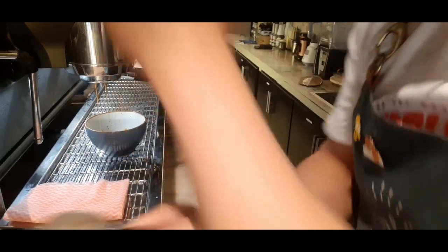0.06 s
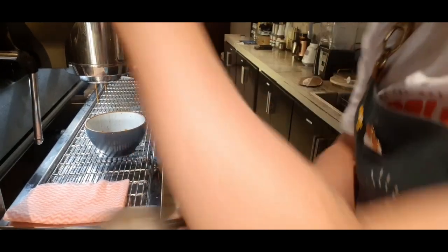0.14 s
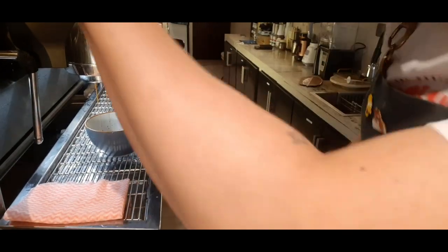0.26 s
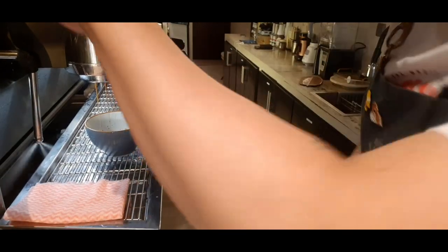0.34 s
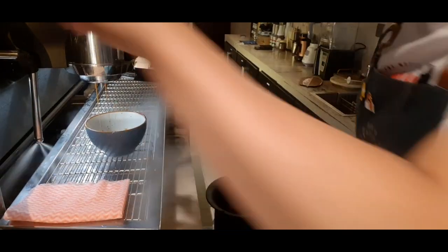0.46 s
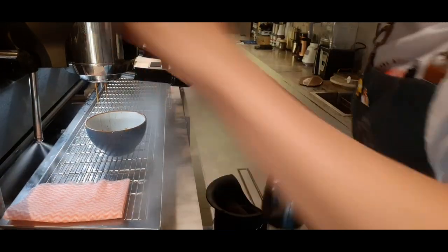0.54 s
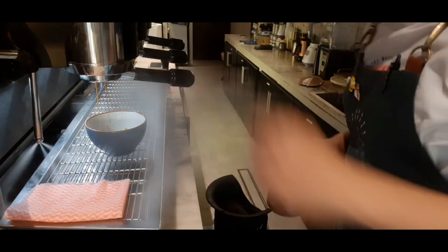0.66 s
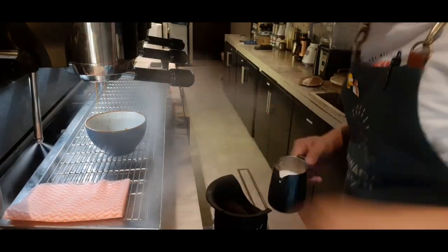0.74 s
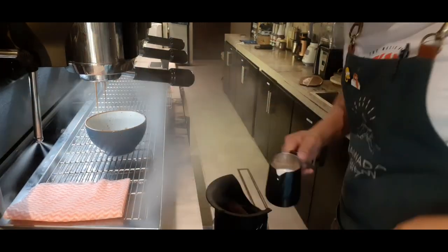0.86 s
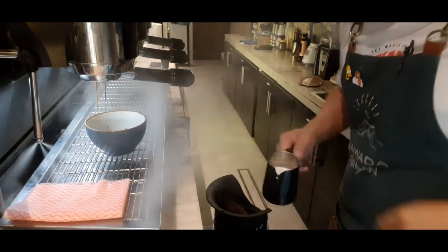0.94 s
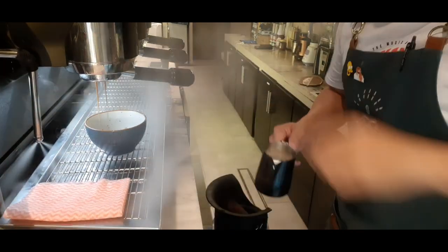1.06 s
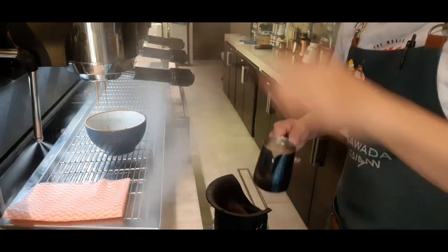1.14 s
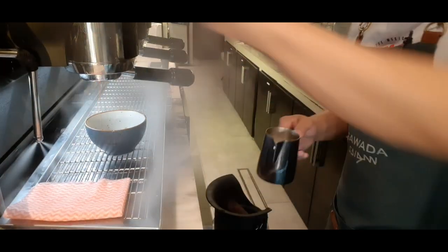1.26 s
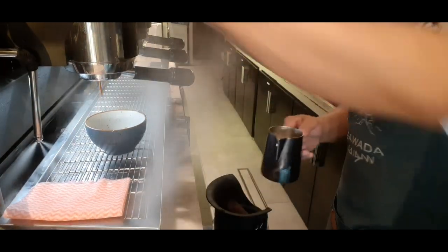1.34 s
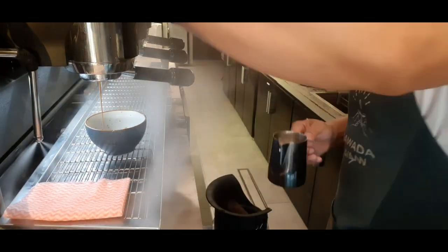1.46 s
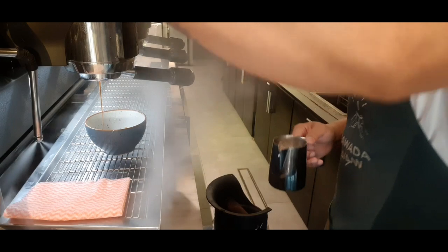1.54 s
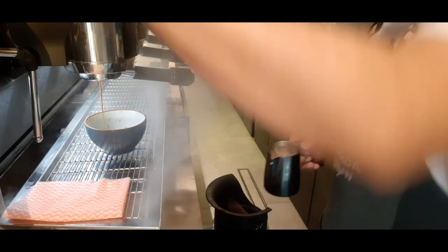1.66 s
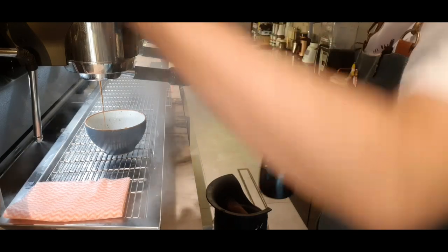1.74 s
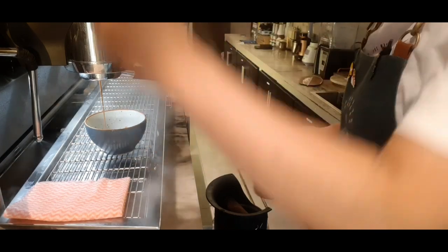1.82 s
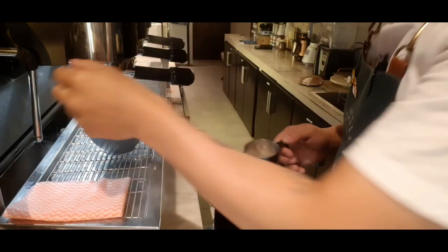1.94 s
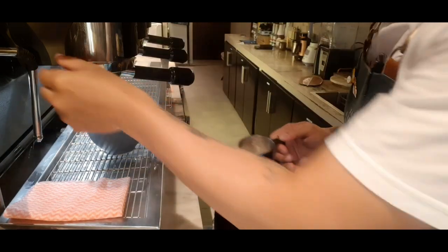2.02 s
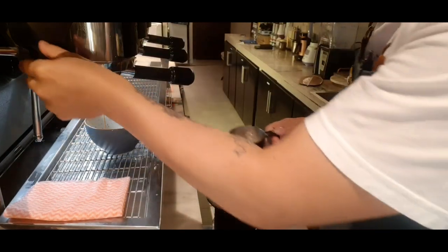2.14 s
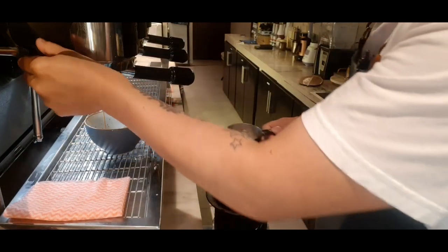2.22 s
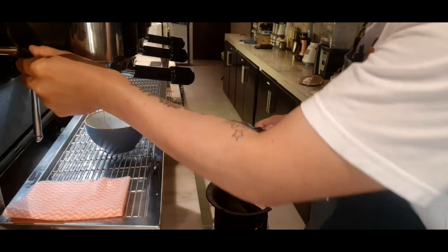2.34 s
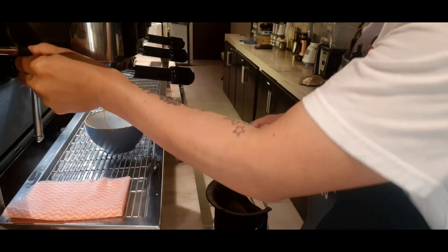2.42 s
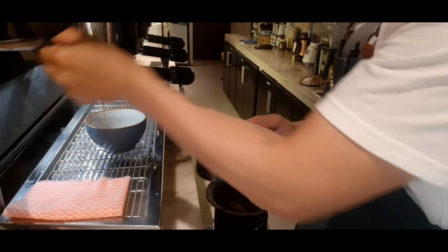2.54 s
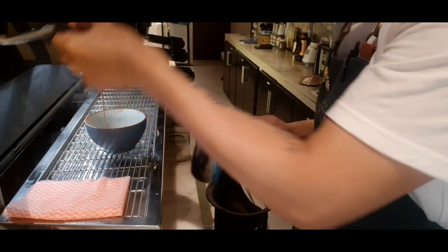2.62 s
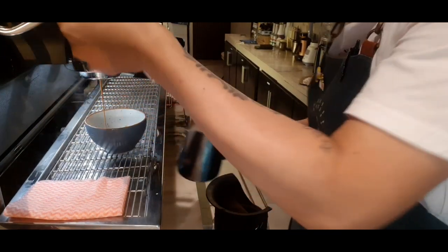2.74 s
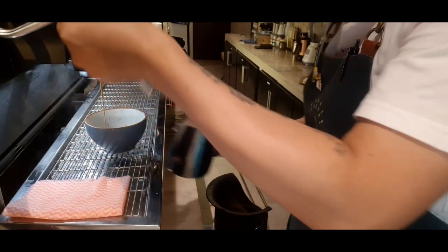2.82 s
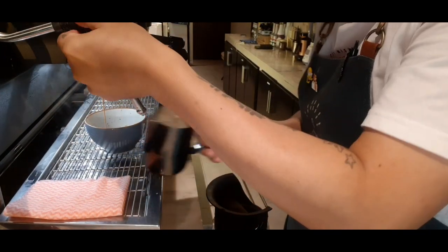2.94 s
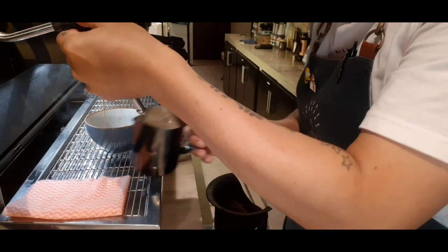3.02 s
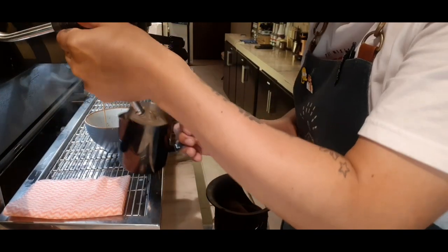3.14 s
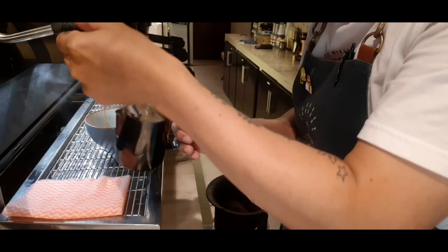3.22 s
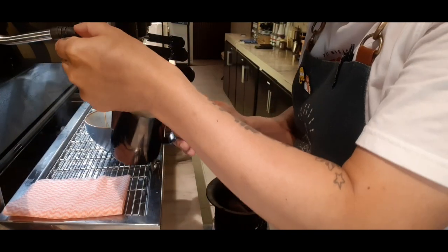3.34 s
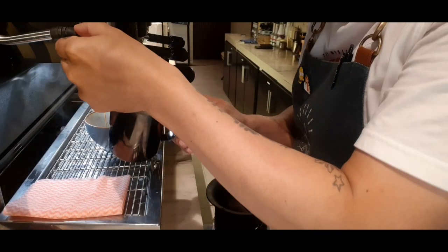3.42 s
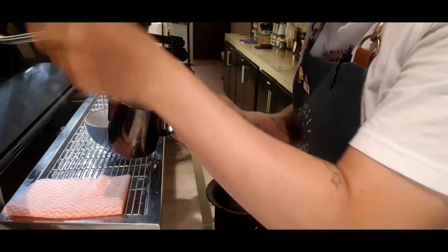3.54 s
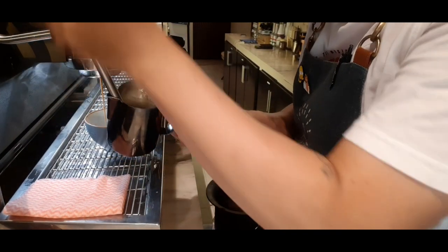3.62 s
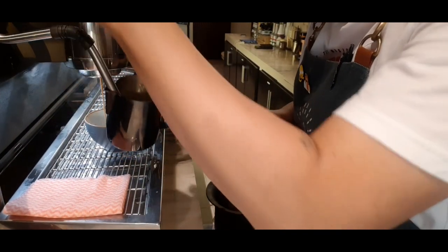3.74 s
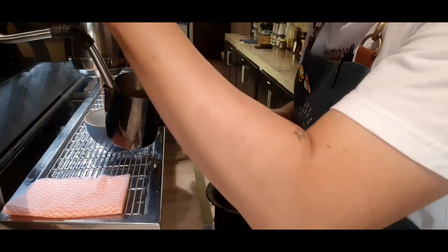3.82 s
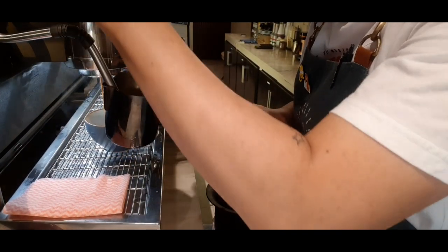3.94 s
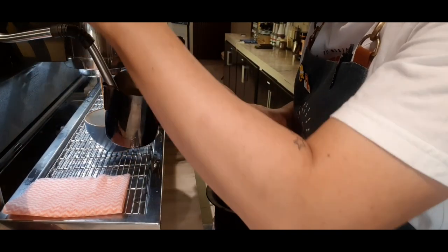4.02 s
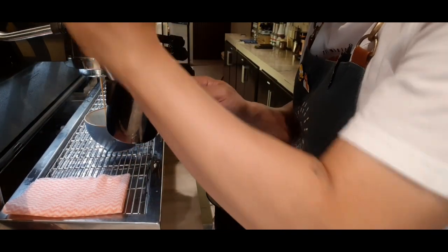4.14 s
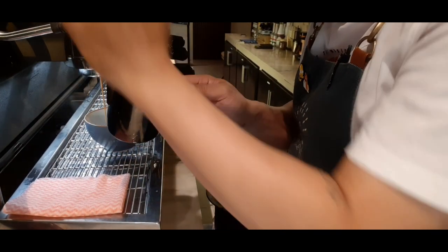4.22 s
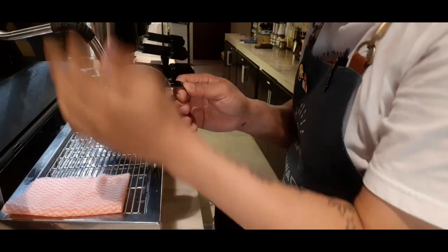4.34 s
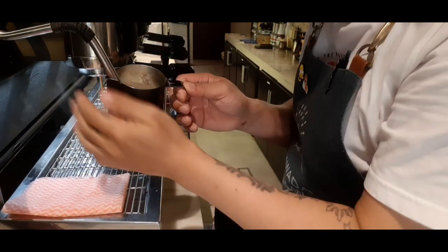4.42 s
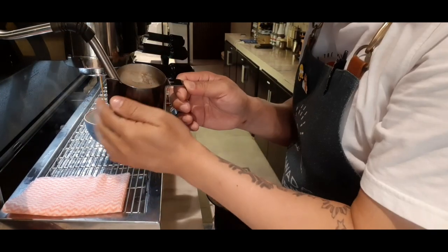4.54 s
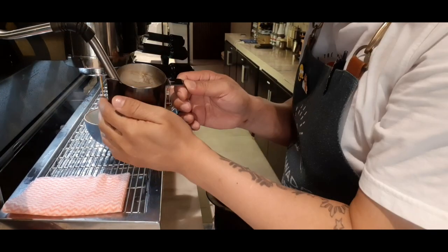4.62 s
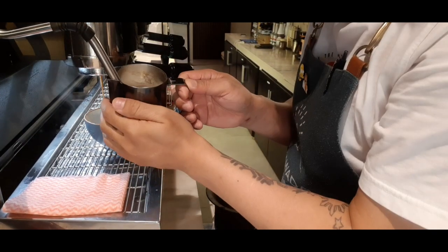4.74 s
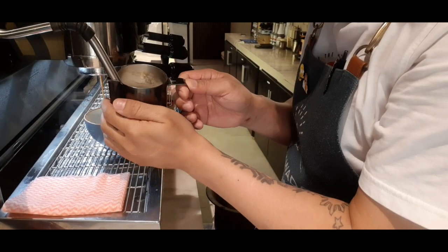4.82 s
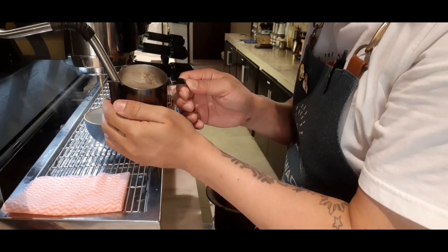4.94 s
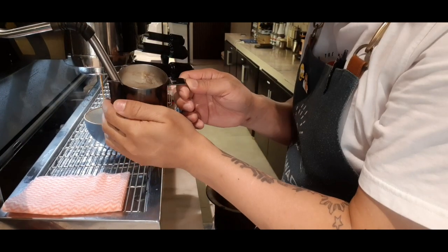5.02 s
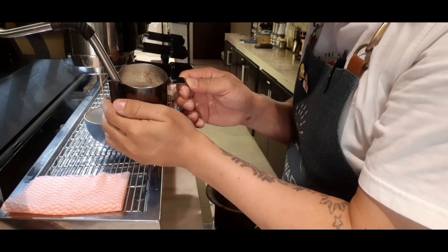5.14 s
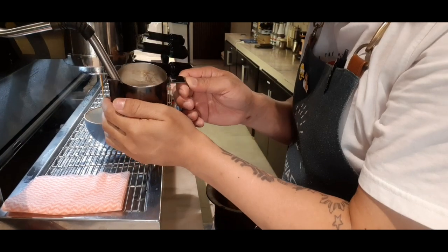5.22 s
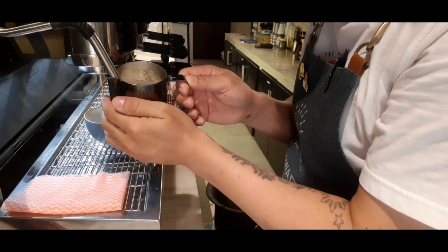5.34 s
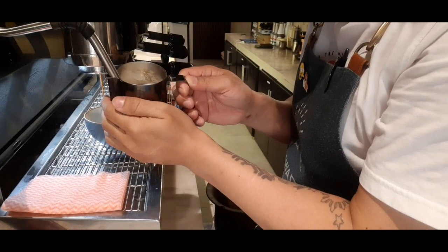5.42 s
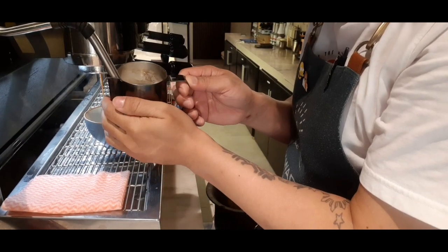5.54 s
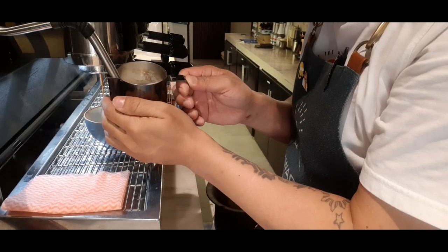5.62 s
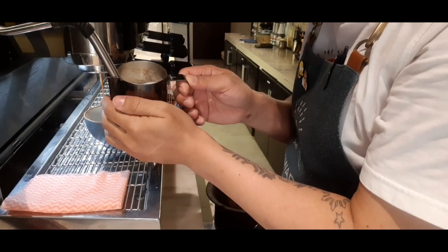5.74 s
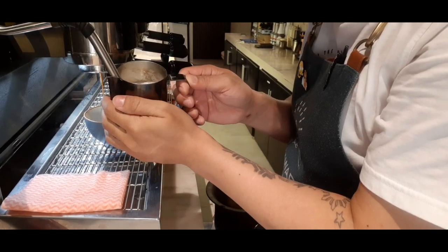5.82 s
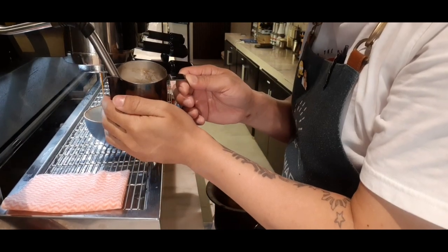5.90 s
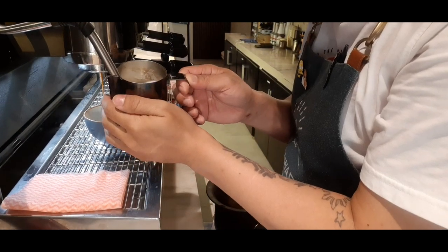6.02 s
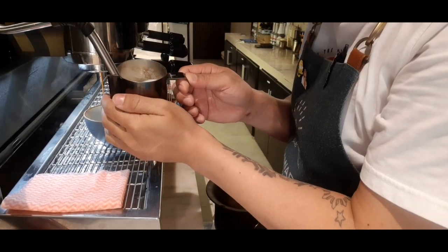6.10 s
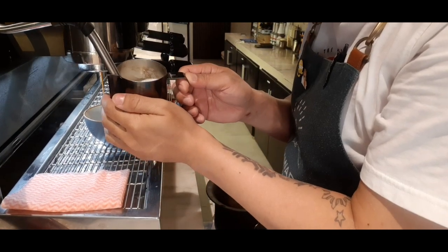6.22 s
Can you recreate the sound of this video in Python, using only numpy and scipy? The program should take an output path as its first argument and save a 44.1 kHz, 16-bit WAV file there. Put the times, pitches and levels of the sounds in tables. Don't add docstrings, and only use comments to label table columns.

```python
import sys
import numpy as np
from scipy import signal
from scipy.fft import rfft, irfft, next_fast_len
from scipy.io import wavfile

SR = 44100
rng = np.random.default_rng(int(sys.argv[2]) if len(sys.argv) > 2 else 0)


def unload_wav(signal):
    wavfile.write(
        sys.argv[1],
        SR,
        np.round(np.clip(np.atleast_2d(signal).T, -1, 1) * 32767).astype(np.int16),
    )


def ratio_of_db(decibels):
    return 10 ** (np.asarray(decibels, float) / 20)


N = 276507
TIME = np.arange(N) / SR
SURFACE_S = 4.95


def in_time(rows):
    s, *columns = np.transpose(rows)
    return [np.interp(TIME, s, c) for c in columns] + [(TIME >= s[0]) & (TIME <= s[-1])]


def at_hz(points, hz):
    table = np.array(points)
    return np.interp(np.log(hz + 1), np.log(table[:, 0]), table[:, 1])


def rms_one(x):
    return x / np.sqrt(np.mean(x ** 2) + 1e-20)


def drift(rate):
    r = np.exp(-32 * np.pi * rate / SR)
    slow = signal.lfilter([1], [1, -2 * r, r * r], rng.standard_normal(N // 16 + 4002))[4000:]
    return np.interp(np.arange(N) / 16, np.arange(len(slow)), rms_one(slow - slow.mean()))


def lagged(envelope, lag_s):
    r = np.exp(-1 / (lag_s * SR))
    return 20 * np.log10(signal.lfilter([1 - r], [1, -r], envelope) + 1e-4)


def filtered(x, order, hz, kind):
    return signal.sosfilt(signal.butter(order, hz, kind, fs=SR, output="sos"), x)


def stereo_noise(alike, lag):
    size = next_fast_len(N)
    hz = np.arange(size // 2 + 1) * SR / size
    shared, left, right = rfft(rng.standard_normal((3, size)))
    c = np.clip(at_hz(alike, hz), 0, 1)
    turn = at_hz(lag, hz) if np.ndim(lag) else 2 * np.pi * hz * lag / SR
    late = shared * np.exp(-1j * turn)
    return hz, size, np.sqrt(c) * np.array([late, shared]) + np.sqrt(1 - c) * np.array([left, right])


def hiss(colour, alike, lag, patchy_db, rate, count=9):
    hz, size, white = stereo_noise(alike, lag)
    place = np.interp(np.log(hz + 1), np.log([colour[0][0], colour[-1][0]]), [0, count - 1])
    out, together, shaped = 0, drift(rate), white * ratio_of_db(at_hz(colour, hz))
    for k in range(count):
        band = irfft(shaped * np.clip(1 - np.abs(place - k), 0, 1), size)[:, :N]
        out = out + band * ratio_of_db(patchy_db * (2.14 * together + drift(rate)))
    return rms_one(out)


def resonant(x, modes):
    out = 0
    for k, (hz, width, db) in enumerate(modes):
        r = np.exp(-np.pi * width / SR)
        ringing = signal.lfilter([1, 0, -1], [1, -2 * r * np.cos(2 * np.pi * hz / SR), r * r], x)
        out = out + (-1) ** k * ratio_of_db(db) * rms_one(ringing)
    return out


def twice_resonant(noise, mode):
    return resonant(resonant(noise, [mode]), [mode])


def bursts(rows, rise, bend=0.87):
    out = np.zeros(N)
    for s, db, t60 in rows:
        at = round(s * SR)
        t = np.arange(N - at) / SR
        out[at:] += ratio_of_db(db - 60 * (t / max(t60, .005)) ** bend) * (1 - np.exp(-(t / rise) ** 2))
    return out


def ring(s, db, hz, t60, climb):
    out, t = np.zeros(N), np.arange(round(1.5 * t60 * SR)) / SR
    at = round(s * SR)
    fade = ratio_of_db(db - 60 * t / t60) * (1 - np.exp(-3.0 * hz * t))
    out[at:at + len(t)] = fade * np.sin(2 * np.pi * hz * t * (1 + climb * t))
    return out


def placed(x, pan_db, lag):
    late = np.interp(np.arange(N) - lag, np.arange(N), x)
    return np.array([ratio_of_db(pan_db / 2) * late, ratio_of_db(-pan_db / 2) * x])


# t/s, level/dB
ROOM = [(0.0, -24), (0.33, -21.5), (0.49, -28), (0.73, -39.5), (1.6, -39.5), (2.04, -40.5), (2.83, -38),
        (3.2, -28), (3.4, -24.5), (4.14, -24), (4.19, -36.5), (4.45, -37), (4.91, -34), (5.19, -38.5),
        (6.27, -37)]
# f/Hz, level/dB per Hz
ROOM_COLOUR = [(25, -20), (38, -14), (52, -3.5), (95, -8.5), (150, -3.5), (263, -8.5), (400, -11.5),
               (800, -13), (1160, -16), (1700, -18.5), (3000, -25.5), (5000, -33), (7700, -36),
               (11000, -39), (16000, -37.5)]
# f/Hz, likeness
ROOM_ALIKE = [(60, 0.94), (130, 0.97), (290, 0.71), (640, 0.33), (1410, -0.19), (3100, 0.017),
              (6820, -0.054), (15000, -0.02)]
# f/Hz, width/Hz, level/dB
HUM = [(55, 11, -17), (119.3, 5.6, -12), (156, 20, -16), (209.3, 8.1, -16), (239.9, 4, -14.5),
       (266.8, 5.4, -9.5), (359.7, 5.9, -12.5), (489, 67, -14), (1550, 28, -17.5)]


def room():
    db = in_time(ROOM)[0]
    air = hiss(ROOM_COLOUR, ROOM_ALIKE, 0, patchy_db=.6, rate=6.0, count=12)
    tones = resonant(rng.standard_normal(N), HUM)
    mains = ratio_of_db(-5.0 + 0.94 * drift(3.1)) * np.sin(2 * np.pi * 119.7 * TIME)
    return ratio_of_db(db - 0.24) * (air + tones + mains) * ratio_of_db([[-.6], [.6]])


def burbles():
    pops = (rng.random(N) < 70.0 / SR) * ratio_of_db(14.0 * np.minimum(rng.exponential(1, N), 3))
    pool = resonant(pops + 1e-18, [(1130, 60, -10.0), (1200, 120, -18.0)])
    return placed(ratio_of_db(in_time(ROOM)[0] - 25) * pool, -1.5, 4.8)


# t/s, level/dB, f/Hz
DRIPS = [(1.9242, -26, 1140), (1.945, -33, 1150), (1.974, -34, 1210), (2.0239, -31, 1094),
         (2.0549, -39, 1170), (2.125, -44, 1250), (2.1561, -32, 1140), (2.202, -37, 1160),
         (2.2245, -37, 1170), (2.2634, -33, 1130), (2.278, -33, 1150), (2.292, -34, 1150),
         (2.35, -36, 1110), (2.3768, -28, 1110), (2.4415, -36, 1150), (2.465, -36, 1130),
         (2.5163, -32, 1160), (2.53, -35, 1150), (2.565, -38, 1090), (2.6745, -36, 1110),
         (2.7144, -37, 1130), (2.79, -33, 1110), (2.8447, -25, 1110), (2.8979, -29, 1140),
         (2.9144, -28, 1130), (3.0087, -36, 1070), (3.0681, -33, 1110), (3.1504, -23, 1170),
         (3.1888, -22, 1220), (3.2327, -18, 1080), (3.2636, -36, 1070), (3.301, -21, 1150),
         (3.32, -23, 1110)]


def drips():
    return placed(sum(ring(s, db - 1.5, hz, 0.033, 1.0) for s, db, hz in DRIPS), -4.0, 4.0)


# t/s, level/dB, t60/s
PUFFS = [(1.7659, -20, 0.13), (1.805, -20, 0.06), (1.8357, -25, 0.05), (1.856, -17, 0.029),
         (2.7901, -42, 0.05), (3.3049, -14, 0.13), (3.4247, -20.5, 0.069), (3.923, -18.5, 0.047),
         (4.962, -19, 0.18)]


def puffs():
    breath = filtered(rng.standard_normal((2, N)), 1, [2500, 9000], "band")
    return ratio_of_db(-0.5) * bursts(PUFFS, rise=0.00074) * breath


# t/s, level/dB, f/Hz, t60/s
KNOCKS = [(.355, -2.5, 725, 0.018), (0.4, -0.5, 155, 0.025), (.427, -6, 230, .02), (0.38, -10, 203, 0.023),
          (4.111, -17, 1110, .02), (4.139, 2, 600, 0.011), (4.959, -7, 180, 0.012), (5.032, -14, 97, 0.048),
          (5.016, -18.5, 440, 0.032), (5.124, -24, 540, 0.013), (4.404, -13, 5900, .012),
          (3.306, -27, 3300, .05), (3.306, -24, 5700, .04), (3.307, -26, 6800, .05),
          (3.306, -19, 6600, .06), (4.404, -16, 2700, 0.012), (3.428, -22, 3450, 0.037),
          (4.157, -15.5, 1870, 0.025), (4.961, -3, 1900, 0.0026)]


def knocks():
    return placed(sum(ring(*row, 0) for row in KNOCKS), -4.0, 4.0)


# t/s, level/dB, start f/Hz, end f/Hz, length/s
SQUEAK = (4.106, -19, 12150, 11800, .016)


def squeak():
    s, db, start_hz, end_hz, length = SQUEAK
    bend = (end_hz / start_hz - 1) / length / 3
    return placed(ring(s, db, start_hz, 2.5 * length, bend), -4.0, 4.0)


# t/s, level/dB, start f/Hz, end f/Hz, length/s, octave level/dB
CREAK = (.324, -23, 5900, 6480, .026, -8)


def creak():
    s, db, start_hz, end_hz, length, octave_db = CREAK
    along = np.clip((TIME - s) / length, 0, 1)
    hz = start_hz + (end_hz - start_hz) * np.sqrt(along) + 133.0 * drift(140.0)
    turn = 2 * np.pi * np.cumsum(hz) / SR
    tone = np.sin(turn) + ratio_of_db(octave_db) * np.sin(2 * turn)
    return placed(ratio_of_db(db) * np.sin(np.pi * along) * tone, -6.0, 4.6)


# f/Hz, level/dB per Hz
PURGE_COLOUR = [(180, -2.5), (300, -5), (1000, -5.5), (1520, -2), (2100, -3.5), (3000, -3.5), (5000, -3.5),
                (7500, -1.5), (10000, -7.5), (12000, 0), (14700, -6), (16000, -3.5)]
# f/Hz, likeness
STEAM_ALIKE = [(300, .7), (1000, .5), (3000, .3), (16000, .33)]


def purge():
    open_s, shut_s, leak_end_s = .3545, 1.665, 1.86
    rush = np.maximum(TIME - open_s, 0) / 0.045
    shut = np.maximum(TIME - shut_s, 0)
    held = ratio_of_db(-16 + 1.5 * rush * np.exp(1 - rush) - 264 * shut)
    leak = ratio_of_db(-26.5 - 33 * shut - 59 * np.maximum(TIME - leak_end_s, 0))
    level = (TIME > open_s) * np.maximum(held, leak)
    return level * hiss(PURGE_COLOUR, STEAM_ALIKE, 9.04, patchy_db=0.47, rate=5.5) * ratio_of_db([[-1.2], [1.2]])


# f/Hz, width/Hz, level/dB
DEEP = [(2700, 400, -8), (3600, 230, 1), (3985, 150, -6), (4740, 200, -7), (5050, 160, -9), (5390, 260, -8),
        (6120, 260, -10), (6600, 220, -9), (7050, 200, -10), (7740, 300, -3)]
# f/Hz, lag/radians
MILK_TURN = [(300, .1), (1400, .6), (3400, .8), (4100, 1.5), (4800, 2.5), (5500, 3.0), (9000, 3.2),
             (10300, 3.8), (11500, 4.6), (14500, 5.0)]


def buried():
    start_s = FLOW[1][0]
    size, white = stereo_noise([(300, .3), (16000, .25)], MILK_TURN)[1:]
    noise = irfft(white, size)[:, :N]
    bands = sum(ratio_of_db(2.3 * drift(15.0)) * twice_resonant(noise, mode) for mode in DEEP)
    level = (TIME > start_s) * (TIME < SURFACE_S) * ratio_of_db(-43.5 + 6.5 * (TIME - start_s))
    return level * bands * ratio_of_db([[-1.0], [1.0]])


# t/s, f/Hz, level/dB
WHISTLE = [
    (4.152, 1864, -26.5),
    (4.168, 2543, -23.5),
    (4.23, 2684, -25),
    (4.335, 2847, -26),
    (4.352, 3030, -34.5),
    (4.6, 3040, -40),
    (4.96, 3075, -42),
]
# f/Hz, width/Hz, level/dB
NOZZLE = [(2380, 450, -6.5), (3660, 320, -17), (3940, 160, -14), (4720, 180, -10), (5220, 180, -6),
          (5460, 240, -2), (6000, 200, -7), (6450, 220, -7.5), (7400, 240, -3), (7670, 310, 4.5),
          (10670, 580, 2), (11170, 700, 7), (12570, 1200, -1), (13800, 3400, 1.5)]
# t/s, level/dB, t60/s
FLARES = [(4.373, -33, .05), (4.397, -32, .05), (4.426, -30, 0.074), (4.471, -33, .03), (4.491, -23, .06),
          (4.515, -33, .15), (4.572, -35, .08), (4.635, -34, .05), (4.661, -30, .05), (4.712, -37, .05),
          (4.745, -21, .05), (4.794, -25, 0.044), (4.823, -30, .07), (4.905, -30, .08)]
# f/Hz, likeness
MILK_ALIKE = [(300, .75), (1400, .65), (3400, .45), (4500, .35), (5800, .6), (7000, .45), (9000, .35),
              (10300, .45), (16000, .5)]


def whistle():
    hz, db, on = in_time(WHISTLE)
    high = hz > 2900
    since = np.maximum(TIME - WHISTLE[0][0], 0)
    turn = 2 * np.pi * np.cumsum(hz + 22 * drift(55.0) * high) / SR
    near, *spread = [(0.7 + drift(90.0)) * np.cos(turn) + drift(90.0) * np.sin(turn) for way in range(3)]
    tone = placed(near, 0, 1.3) + 0.84 * np.array(spread)
    size, white = stereo_noise(MILK_ALIKE, MILK_TURN)[1:]
    noise = irfft(white, size)[:, :N]
    upper = sum(twice_resonant(noise, mode) for mode in NOZZLE)
    catch = 1 - np.exp(-(since / 0.014) ** 2)
    level = ratio_of_db(db - 3.0 + 3 * drift(27.0) * high) * catch + ratio_of_db(-2.0) * bursts(FLARES, rise=0.002)
    upper_db = db + 2.0 - 6 * (1 - np.exp(-since / 0.045))
    return on * (level * tone + ratio_of_db(upper_db) * upper) * ratio_of_db([[-1.3], [1.3]])


def bubbling(modes, per_s, clump_db, rate):
    size, white = stereo_noise(MILK_ALIKE, MILK_TURN)[1:]
    sizes = ratio_of_db(2.9 * np.minimum(rng.exponential(1, N), 4))
    pops = (rng.random(N) < per_s / SR) * sizes * rng.choice([-1, 1], N)
    drive = irfft(white, size)[:, :N] + 0.5 * placed(rms_one(pops), 0, 1.8)
    return [resonant(drive * ratio_of_db(clump_db * drift(rate)), [mode]) for mode in modes]


# t/s, level/dB, f/Hz
GLUGS = [(4.992, -18.5, 1350), (5.012, -19, 1060), (5.022, -18.5, 1130), (5.032, -30, 1400),
         (5.042, -37, 1250), (5.102, -20, 1340), (5.175, -18, 1470), (5.188, -21, 1750), (5.203, -22, 1430),
         (5.2157, -35, 1480), (5.228, -34, 1500), (5.2457, -33, 1450), (5.26, -28, 1500),
         (5.274, -22, 1490), (5.286, -27, 1520), (5.301, -21, 1534), (5.312, -33, 1550), (5.402, -24, 1440),
         (5.426, -24, 1380), (5.448, -20, 1410), (5.4718, -20.5, 1580), (5.551, -24, 1230),
         (5.5696, -18, 1550), (5.599, -22, 1550), (5.6465, -28, 1530), (5.705, -23, 1550),
         (5.7631, -39, 1310), (5.7984, -29, 1580), (5.856, -22.5, 1110), (5.8962, -33, 1170),
         (5.928, -35, 1390), (5.945, -19, 1550), (5.974, -18, 1520), (6.0195, -46, 1520),
         (6.0858, -36, 1550), (6.193, -32, 1660)]
# t/s, level/dB, f/Hz
PINGS = [(5.0153, -17, 3320), (5.031, -13.5, 2990), (5.075, -27, 3300), (5.09, -18, 3240),
         (5.1794, -27, 3750), (5.395, -24, 3210), (5.41, -23, 3200), (5.424, -25, 3220),
         (5.4374, -24, 3250), (5.5328, -19, 3270), (5.549, -20, 3170), (5.567, -23, 3220),
         (5.584, -21, 3210), (5.6, -24, 3200), (5.6136, -21, 3210), (5.627, -20, 3200), (5.653, -25, 3150),
         (5.7316, -43, 3210), (5.9047, -23, 3610), (5.9247, -14, 3650), (5.9716, -19, 3740),
         (5.99, -29, 3700), (6.0753, -28, 3150), (6.0927, -21, 3240), (6.156, -18, 3180),
         (6.175, -24, 3150)]


def bubbles():
    big = sum(ring(s, db - 0.5, hz, 0.028, 2.9) for s, db, hz in GLUGS)
    small = sum(ring(s, db - 4.5, hz, 0.033, 0.79) for s, db, hz in PINGS)
    return placed(big + small, -2.0, 1.6)


# f/Hz, width/Hz, level/dB
PITCHER = [(1150, 210, -3.5), (1410, 160, -5.5), (1530, 140, 1.0), (1980, 200, -5.5)]


def gurgle(air):
    churn = bursts([(s, db - 15.5, 0.11) for s, db, hz in GLUGS], rise=0.0033)
    rest = (TIME > SURFACE_S) * ratio_of_db(-27)
    level = churn + ratio_of_db(-32.0 + 0.55 * lagged(air + rest, 0.021))
    return level * sum(bubbling(PITCHER, 250.0, clump_db=3.5, rate=22.0))


# f/Hz, width/Hz, level/dB
WALL = [(3215, 75, -4), (3650, 300, 0), (4900, 3400, 5)]


def wall_ring(air):
    surfaced = TIME > SURFACE_S
    shiver = bursts([(s, db - 21, 0.17) for s, db, hz in PINGS], rise=0.0037)
    low, middle, broad = bubbling(WALL, 400.0, clump_db=3.0, rate=36.0)
    sunk_db = -52 + 9.5 * (TIME - FLOW[0][0])
    ring_db = np.where(surfaced, -26 + 0.45 * lagged(air + ratio_of_db(-44), 0.03), sunk_db)
    narrow = surfaced * low + ratio_of_db(-5.0 * surfaced) * middle
    return ratio_of_db(1.5) * shiver * narrow + ratio_of_db(ring_db - 3.3 * surfaced) * (narrow + broad)


# f/Hz, level/dB per Hz
FROTH_COLOUR = [(300, -8), (1000, -9), (3000, -26), (4500, -1.5), (6000, -2), (7500, 2.5), (10000, -7),
                (12000, 1), (14500, -4.5), (16000, -1.5)]
# t/s, level/dB
FLOW = [
    (4.135, -30),
    (4.159, -6),
    (4.18, -40),
    (4.45, -26),
    (4.66, -28),
    (5.22, -31.5),
    (5.3, -49),
    (5.54, -62),
    (5.72, -46),
    (6.27, -45),
]


def tearing(spits, air):
    flow_db, on = in_time(FLOW)
    jet = hiss(FROTH_COLOUR, MILK_ALIKE, MILK_TURN, patchy_db=.5, rate=40.0)
    edge = filtered(jet, 2, 9700, "high")
    bright = filtered(jet, 4, 5700, "high")
    steady = np.where(TIME > SURFACE_S, jet, bright + ratio_of_db(-3.5) * (jet - bright))
    tear = on * ratio_of_db(flow_db - 0.5) * steady + ratio_of_db(-1.5) * air * (jet + edge)
    foam = filtered(jet[:, ::-1], 2, [4600, 8000], "band")
    return tear * ratio_of_db([[-1.7], [1.7]]) + ratio_of_db(-6 + lagged(spits, 0.067)) * foam


# t/s, level/dB, t60/s
SPITS = [(5.395, -29, 0.054), (5.427, -24, 0.035), (5.4346, -34, 0.04), (5.487, -36, .05), (5.53, -42, .12),
         (5.5524, -21, 0.12), (5.5614, -19, .05), (5.5688, -17.5, 0.1), (5.6796, -26, 0.02),
         (5.7015, -9.5, 0.054), (5.76, -5.5, 0.027), (5.775, -27, 0.051), (5.8535, -7, 0.042),
         (5.8945, -7, 0.027), (5.9175, -8, 0.028), (5.9245, -13, .025), (5.9355, -14, 0.025),
         (5.944, -13, 0.021), (5.961, -10, 0.022), (5.9705, -7, 0.038), (5.983, -4.5, 0.032),
         (6.073, -22, 0.075), (6.086, -11.5, 0.092), (6.189, -15, .02), (6.1935, -7.5, 0.018),
         (6.208, -29, 0.082), (6.222, -28, 0.058)]
# t/s, level/dB, t60/s
GULPS = [
    (4.955, -11, 0.026),
    (4.988, -14, 0.25),
    (5.012, -24, 0.12),
    (5.028, -23, .05),
    (5.052, -27, 0.27),
    (5.092, -18.5, 0.31),
    (5.155, -14.5, 0.16),
    (5.204, -21, 0.062),
    (5.244, -20, 0.056),
    (6.095, -21.5, 0.31),
]


def froth():
    spits = ratio_of_db(-4.0) * bursts(SPITS, rise=0.0024, bend=1.22)
    afterwash = ratio_of_db(-30 + lagged(spits, .12))
    air = spits + afterwash + ratio_of_db(-4.5) * bursts(GULPS, rise=0.0051, bend=1.42)
    on = in_time(FLOW)[-1]
    pitcher = on * (gurgle(air) + wall_ring(air)) * ratio_of_db([[-1.1], [1.1]])
    return tearing(spits, air) + pitcher + bubbles()


def scene():
    background = room() + burbles() + drips() + puffs()
    handling = knocks() + squeak() + creak()
    return background + handling + purge() + buried() + whistle() + froth()


def band_limit(x):
    return signal.sosfilt(signal.butter(12, 16820, fs=SR, output="sos"), x)


# f/Hz, width/Hz, level/dB
MIC_NOTCH = (8680, 800, -21)


def record(dry):
    size = next_fast_len(N + 4096)
    hz = np.arange(size // 2 + 1) * SR / size
    notch_hz, width, db = MIC_NOTCH
    notch = ratio_of_db(db / (1 + (2 * (hz - notch_hz) / width) ** 2) ** 2)
    top_cut = ratio_of_db(-55 * (hz > 15650))
    low_cut = 1 / (1 + (40 / (hz + 1)) ** 7)
    tilt = ratio_of_db(np.array([[-.6], [.6]]) * (hz > 7000))
    mix = irfft(rfft(dry, size) * notch * top_cut * low_cut * tilt, size)[:, :N]
    return band_limit(np.clip(mix, -1, 1))


dry = scene()
out = record(dry)
unload_wav(out)
```